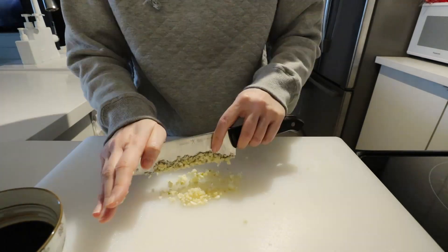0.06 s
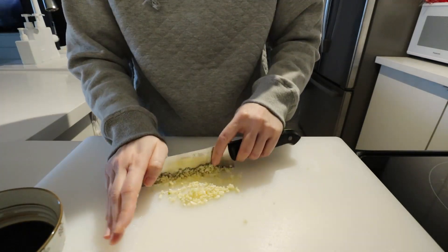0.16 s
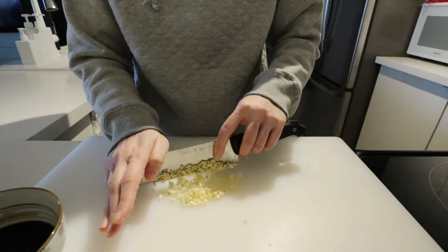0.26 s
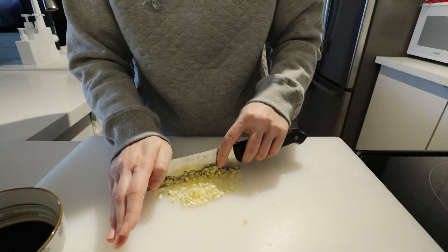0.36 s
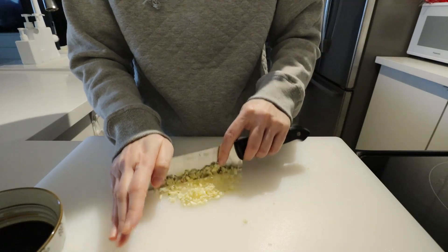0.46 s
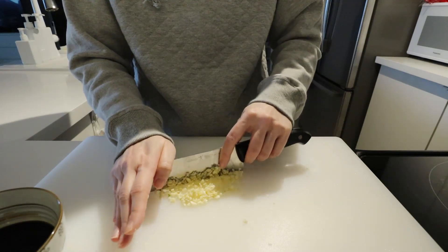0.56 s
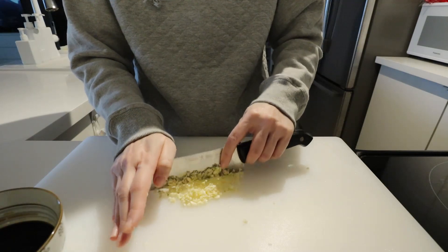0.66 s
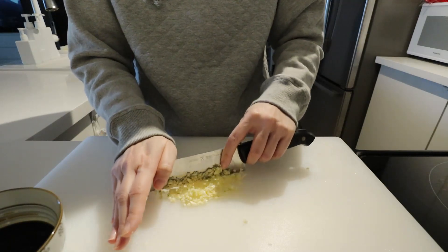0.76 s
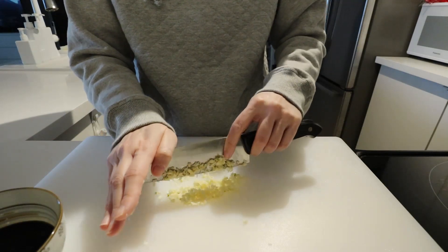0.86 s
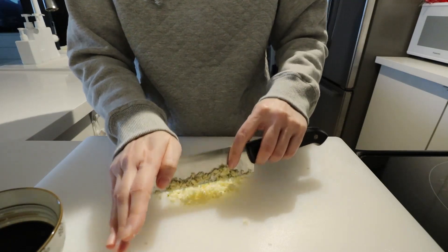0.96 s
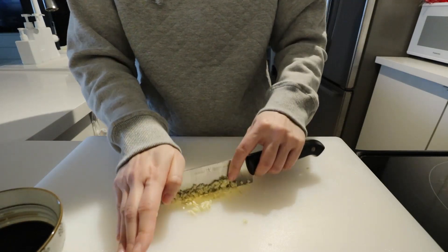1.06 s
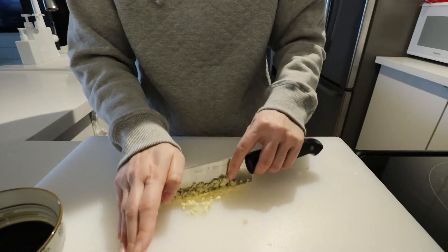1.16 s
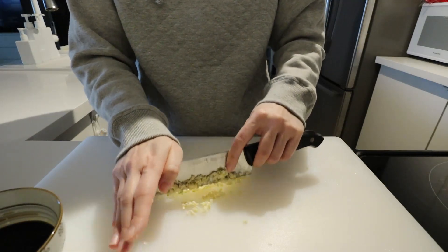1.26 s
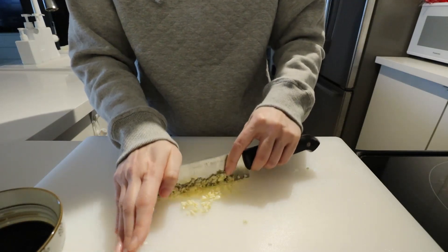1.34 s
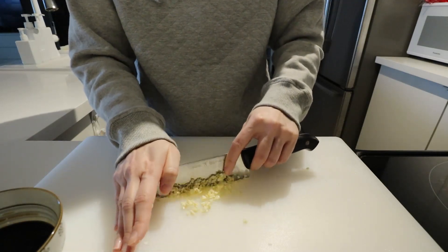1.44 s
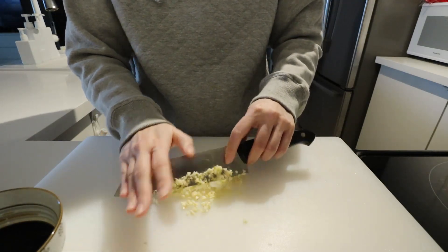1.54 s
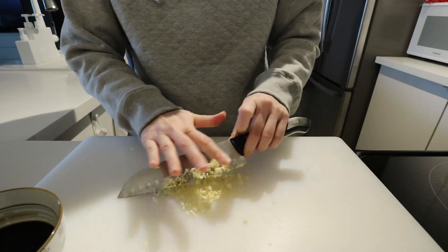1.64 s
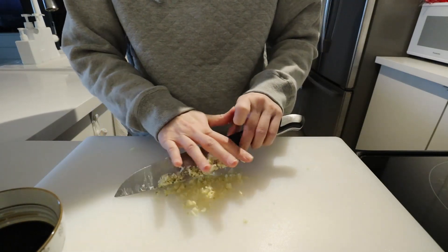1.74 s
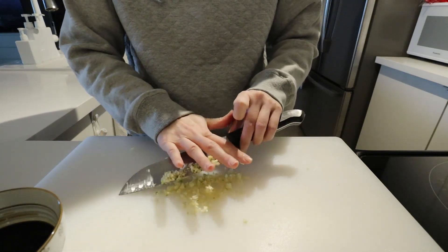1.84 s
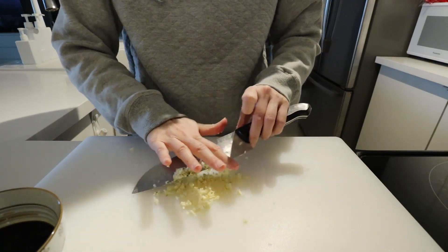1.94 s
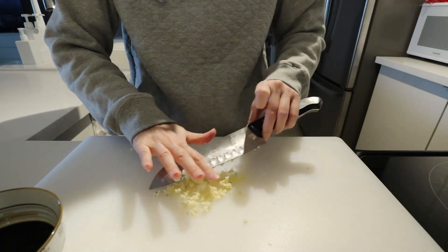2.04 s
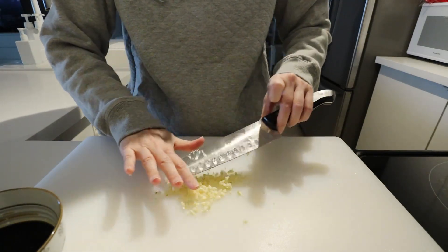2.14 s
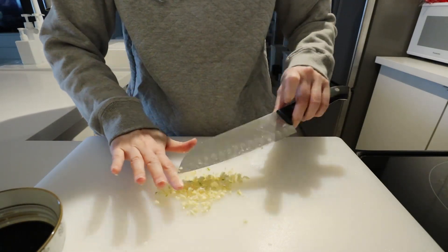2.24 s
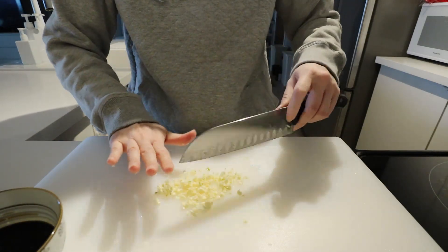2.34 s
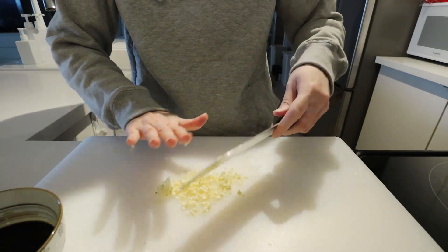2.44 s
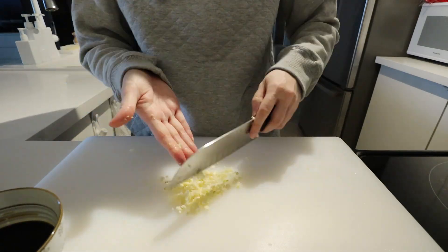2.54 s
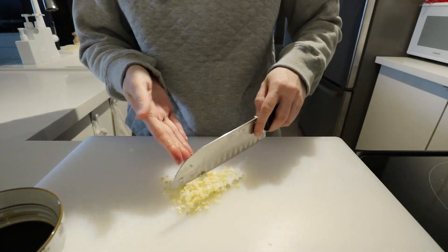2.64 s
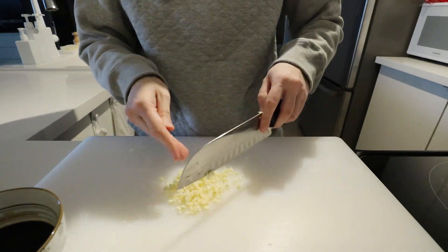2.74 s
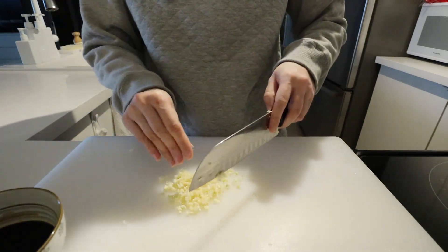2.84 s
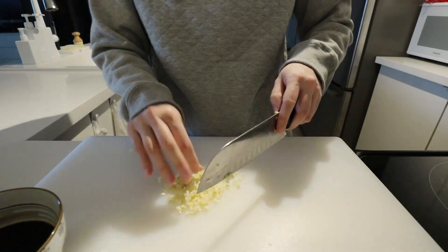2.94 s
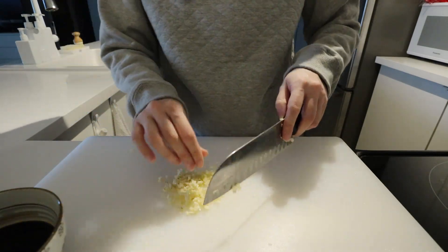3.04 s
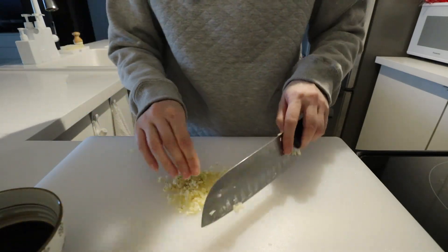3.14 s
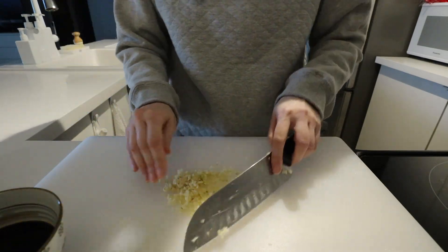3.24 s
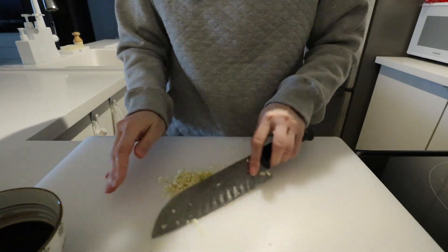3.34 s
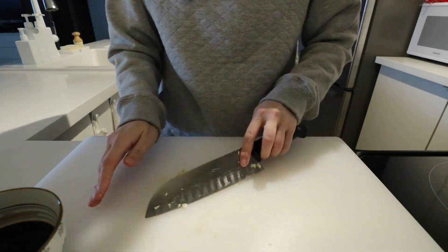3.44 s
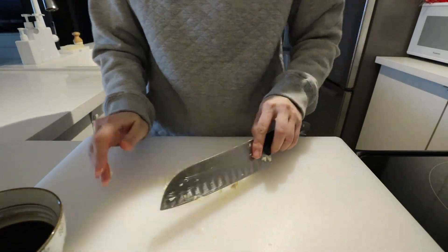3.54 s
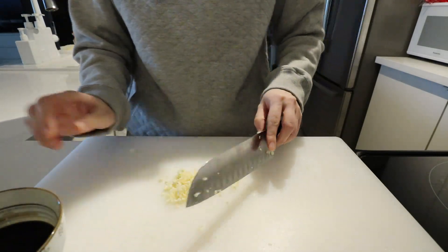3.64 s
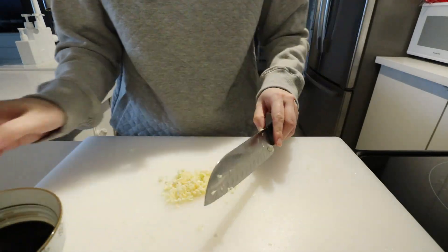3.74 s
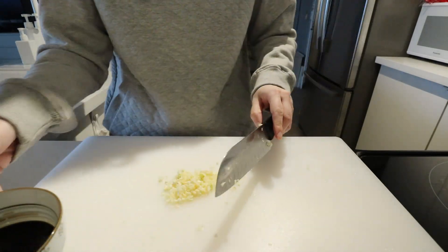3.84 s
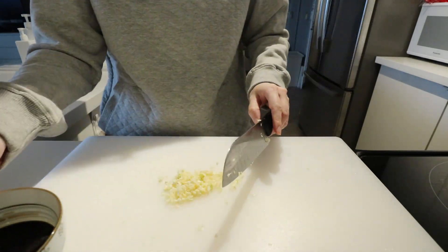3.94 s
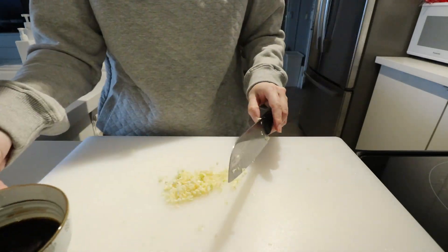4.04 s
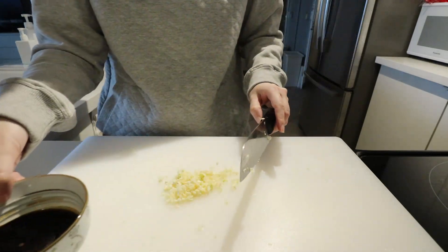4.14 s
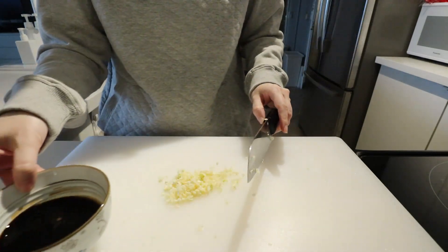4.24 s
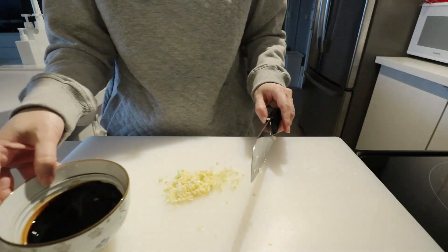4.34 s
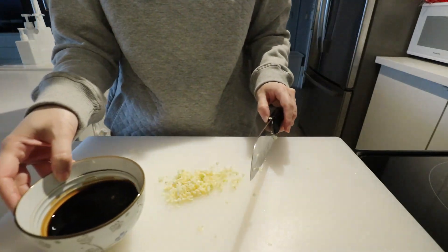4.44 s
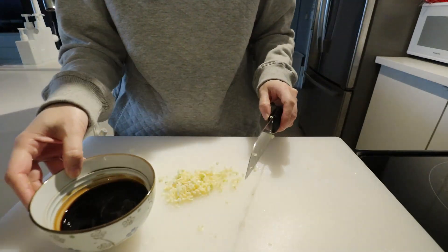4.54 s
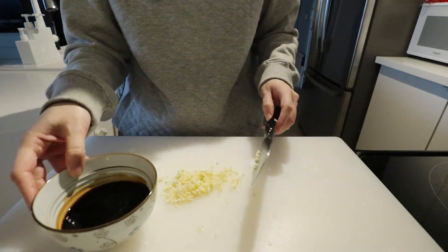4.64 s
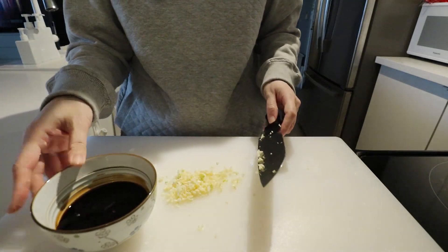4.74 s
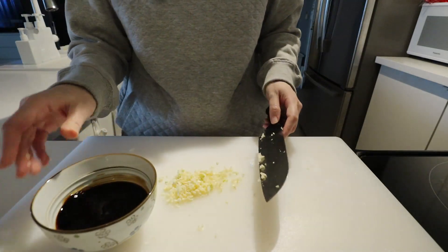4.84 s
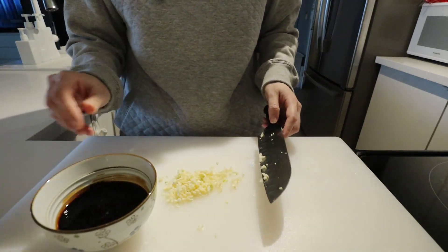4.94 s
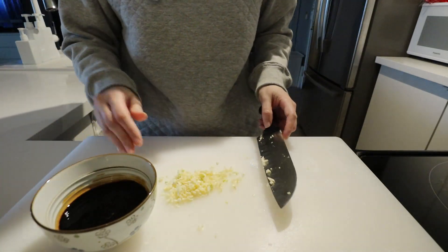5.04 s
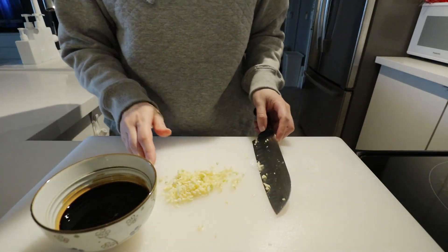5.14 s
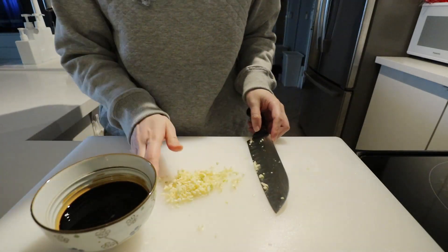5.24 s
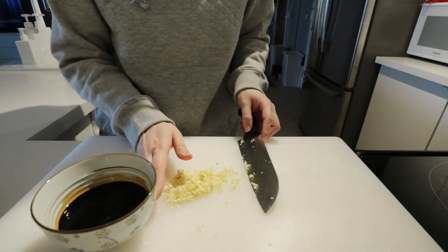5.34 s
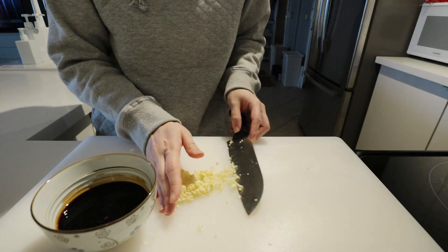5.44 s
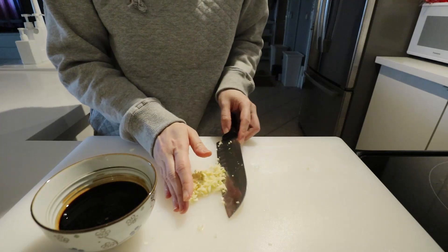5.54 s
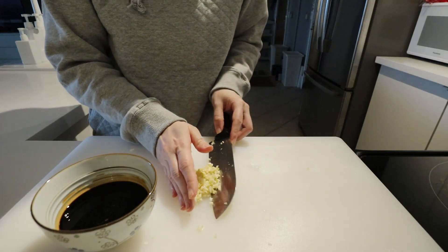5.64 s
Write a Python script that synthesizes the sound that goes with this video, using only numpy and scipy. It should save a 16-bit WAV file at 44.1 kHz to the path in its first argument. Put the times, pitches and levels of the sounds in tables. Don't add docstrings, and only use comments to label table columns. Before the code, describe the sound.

A close stereo microphone in a small, slightly reverberant kitchen hears low fridge hum and quiet room tone. Seven hard knife chops strike a plastic board at about 0.24, 0.41, 0.56, 0.77, 1.11, 1.26 and 1.45 s: dry, hollow knocks with counter thud and brief wet garlic crunches, the third and fourth sharpest, peaks flattened. The background dips, then recovers by 2.5 s. From 1.9 to 2.5 s come faint ticks, dull rubs, light sleeve rustle and a tiny squeak at 2.2 s. A short wipe of the blade sounds at 2.52 s, then a very soft stroke near 2.8 s. At 3.38 s a double knock leads into a bright scrape slowing until 3.6 s. From 4.07 to 4.7 s a bowl drags with low judder and rasp; its china rings faintly at 4.77 s. A clack at 5.22 s precedes gritty, humming shoves of the blade to the end.

```python
import sys
import numpy as np
from scipy import signal
from scipy.fft import rfft, irfft, next_fast_len
from scipy.io import wavfile
from scipy.ndimage import uniform_filter1d

SR = 44100
rng = np.random.default_rng(int(sys.argv[2]) if len(sys.argv) > 2 else 0)


def output_pcm(signal):
    pcm = np.clip(np.atleast_2d(signal).T, -1, 1) * 32767
    wavfile.write(sys.argv[1], SR, np.round(pcm).astype(np.int16))


def rack_gain(trim_db):
    fader = np.asarray(trim_db, float)
    return 10 ** (fader / 20)


N = 250929
TIME = np.arange(N) / SR
SIZE = next_fast_len(N + SR)
HZ = np.arange(SIZE // 2 + 1) * SR / SIZE + 1e-6

# (frequency [Hz], density [dB per Hz])
SCRAPE_TONE = [(240, -64.5), (400, -8), (595, 7.5), (1100, 10), (1910, -1), (2880, -7), (3620, 2),
               (10300, -18.5), (15500, -49)]
# (frequency [Hz], width [Hz], level [dB])
SCRAPE_RING = [(610.72, 90, 1.5), (1444.1, 103, 6), (3732.8, 44, -1.689), (4314.9, 40, 0.5),
               (5136.8, 180, -12.5), (6262, 440, -19), (7670, 41, -73), (9138, 61, -19.5), (10132, 32, -14)]


def level(x, db):
    return x * rack_gain(db) / np.sqrt(np.mean(x ** 2))


def steady(x, size=2600):
    return x / np.sqrt(uniform_filter1d(x ** 2, size=size))


def through(x, response):
    return irfft(rfft(x, SIZE) * response, SIZE)[..., :N]


def tone(points):
    hz, db = np.transpose(points)
    return rack_gain(np.interp(np.log(HZ), np.log(hz), db))


def peak(hz, width):
    return 1j * HZ * width / (hz ** 2 - HZ ** 2 + 1j * HZ * width)


def ring(hz, t60, seconds):
    t = np.arange(int(seconds * SR)) / SR
    return np.sin(2 * np.pi * hz * t) * rack_gain(-60 * t / t60)


def add(out, x, s):
    i = int(s * SR)
    out[i:i + len(x)] += x[:N - i]


def curve(rows, column=1):
    rows = np.array(rows)
    return np.interp(TIME, rows[:, 0], rows[:, column])


def gate(rows):
    is_open = (TIME > rows[0][0]) & (TIME < rows[-1][0])
    return uniform_filter1d(1. * is_open, size=176)


def walk(rate):
    k = int(SR / rate)
    held = np.repeat(rng.standard_normal(N // k + 1), k)
    return 0.71 * uniform_filter1d(held, k)[:N]


def grit(spread_db, flutter_db, rate):
    catches = np.minimum(rng.exponential(size=N), 4)
    return rng.standard_normal(N) * rack_gain(spread_db * catches + flutter_db * walk(rate))


def strokes(rows, attack_s, release_s, extra_db_s=0):
    first_s, last_s = rows[0][0], rows[-1][0] + rows[-1][1]
    gain = 0
    for s, length_s, db, drift_db_s in rows:
        edges = np.maximum(s - TIME, 0) / attack_s + np.maximum(TIME - s - length_s, 0) / release_s
        drift_db = drift_db_s * np.clip(TIME - s, 0, length_s)
        gain = gain + rack_gain(db + drift_db - 30 * np.minimum(edges, 5))
    return gain * rack_gain(extra_db_s * np.clip(TIME - first_s, 0, last_s - first_s))


def chops():
    # (time [s], peak level [dB], crush length [ms], crunch level [dB], contact [ms])
    blows = [
        (0.238, -11, 16.23, -41, 0.51375),
        (0.413, -16.5, 20.985, -35, 0.80405),
        (0.563, -7.5, 9.145, -47, 0.08826),
        (0.768, -10, 7.7, -49, 0.09285),
        (1.109, -12.5, 19, -44, 0.32),
        (1.257, -14, 9.2, -50.5, 0.26),
        (1.445, -13.5, 11.886, -40.5, 0.3656),
    ]
    # (frequency [Hz], level [dB], t60 [s])
    board_modes = [(85.72, 3.5, 0.12), (194.46, -1.5, 0.03), (541.66, 2.5, .04), (728.12, 5.5, 0.041),
                   (793.65, 3.5, 0.048), (882.54, 7, 0.054), (1128.8, 3.5, .04), (1380, 9.5, 0.02284),
                   (1775, -5, 0.065), (2050, -8, .02), (1104, -7.5, 0.0062), (2573.9, -30, 0.016)]
    ping_db = -43
    thud_at_1ms_db, thud_db_per_doubling = -3.5, 5.5
    snap_db, snap_db_per_db, snap_t60_s = -37, 3, 0.029
    clamp_ms, clamp_db = 5.6, -7

    board, edge, snap = np.zeros((3, N))
    t = np.arange(int(.25 * SR)) / SR
    push_ms = 1000 * t[:220] - 1
    clamp = rack_gain(clamp_db / (1 + np.exp(np.clip((clamp_ms - 1000 * t) / 0.29, -50, 50))))
    lead_s = np.arange(-.04, .03, 1 / SR)
    chance = rng.standard_normal((len(blows), 2, len(board_modes)))
    sign = -(-1.) ** (np.arange(len(board_modes)) // 2)
    for (s, db, crush_ms, crunch_db, contact_ms), (spot, detune) in zip(blows, chance):
        thud_db = thud_at_1ms_db + thud_db_per_doubling * np.log2(contact_ms)
        modes = 0
        for (hz, mode_db, t60), k, a, b in zip(board_modes, sign, spot, detune):
            gain = k * rack_gain(mode_db + 0.41 * a + thud_db * (hz < 300))
            modes = modes + gain * ring(hz * (1 + 0.02 * b), t60, .25)
        push = .12 * contact_ms ** 3 * np.exp(-.5 * (push_ms / .06) ** 2)
        for late_ms, size in ((0, 0.87), (2.2, 0.1)):
            push = push + size * np.exp(-.5 * ((push_ms - late_ms) / (0.26534 * contact_ms)) ** 2)
        blow = np.convolve(modes, push)[:len(t)] * clamp
        add(board, rack_gain(db) * blow / np.abs(blow).max(), s)
        ping = np.convolve(ring(3480, 0.0062, .01), np.hanning(8))
        add(board, rack_gain(ping_db + 5.1 * (db + 8.5)) * ping, s + .0009)
        away_s = np.where(lead_s < 0, -lead_s, 1.1 * lead_s)
        crush = rack_gain(crunch_db - 20 * away_s / (crush_ms / 1000))
        add(edge, rack_gain(db) * crush, s + lead_s[0])
        add(snap, rack_gain(snap_db + snap_db_per_db * (db + 10) - 60 * t / snap_t60_s), s + 0.00049)
    crack = through(snap * rng.standard_normal(N), peak(3100, 2000) ** 3)
    garlic = (peak(4900, 3400) ** 2 + 0.36 * peak(6200, 7000) ** 2
              + .4 * peak(3500, 1500) ** 2 + 0.66 * peak(1800, 1000) ** 2)
    return board + crack + through(edge * level(grit(1.4, 1.5, 400), 0), garlic)


def ticks():
    # (time [s], peak level [dB], centre [Hz], fizz level [dB])
    knocks = [(1.889, -58.5, 762.3, -13), (1.912, -56.5, 776, -16.5), (1.939, -54.5, 764.4, -11.5),
              (1.962, -58, 760, -5.5), (1.995, -58, 1308, 0.5), (2.037, -61, 951.2, -2),
              (2.057, -59, 950, 4.5), (2.342, -66, 778.4, 6), (2.419, -62.5, 677.6, 6.5),
              (2.436, -65.5, 868.8, 6), (2.464, -60.5, 849.6, 7.5), (3.38, -31.5, 1919, -9.5),
              (3.403, -34, 2012, 4.5), (3.801, -52.5, 1583, -9), (4.085, -58, 558.9, -24.5),
              (4.129, -51, 1319, -16), (4.475, -54.5, 2432, 7.5), (4.512, -43.5, 722, -19),
              (4.575, -46.5, 1621, -6), (4.828, -59.5, 3792, -5.5), (5.219, -35, 1380, -10.5),
              (5.222, -41.5, 2672, -6.5), (5.225, -38.5, 779.1, -23)]
    tick_t60_s, tick_thud_db = 0.018296, -13
    dull_stretch, loud_stretch = .35, 0.13
    dull_thud = 0.4561

    note, fizz, thud = np.zeros((3, N))
    chance = rng.standard_normal((len(knocks), 1500))
    for (s, db, hz, fizz_db), puff in zip(knocks, chance):
        t60 = tick_t60_s * rack_gain(-dull_stretch * fizz_db + loud_stretch * (db + 59))
        puff = puff * rack_gain(-60 * np.arange(1500) / SR / t60)
        knock = np.convolve(puff, ring(hz, 0.013, 0.01))[:1500]
        add(note, rack_gain(db) * knock / np.abs(knock).max(), s)
        add(fizz, rack_gain(db + fizz_db) * puff, s)
        add(thud, rack_gain(db + tick_thud_db - dull_thud * fizz_db + 21) * puff, s)
    return (through(note, peak(1500, 2800)) + through(fizz, peak(3800, 3900) ** 3 * peak(3000, 9000))
            + through(thud, peak(170, 340) * peak(240, 800)))


def rub(rows, feel, colour, rings, ring_db, spread_db, flutter_db, steel_db):
    attack_s, release_s, body_db, hiss_db, hiss_db_s = feel
    low, high = 1 / (1 + (HZ / 950) ** 6), 1 / (1 + (3250 / HZ) ** 6)
    contact = tone(colour) + sum(rack_gain(ring_db + db) * peak(hz, width) for hz, width, db in rings)
    steel = sum(peak(hz, 45) for hz in 1800 * 7 ** rng.random(size=36))
    contact = contact * (1 + rack_gain(steel_db) * steel)
    pressure = rack_gain(flutter_db * walk(60))
    out = 0
    for db, db_s, band in ((0, 0, 1 - low - high), (body_db, 0, low), (hiss_db, hiss_db_s, high)):
        push = pressure * grit(spread_db, 1.0, 110)
        force = rack_gain(db) * strokes(rows, attack_s, release_s, db_s)
        out = out + through(push * force, contact * band) / np.std(through(push, contact * band))
    return out


def gather():
    # (start [s], length [s], level [dB], drift [dB/s])
    rows = [
        (1.888, 0.0071, -71.5, -5.5),
        (1.95, 0.05476, -70, 30),
        (2.03, .035, -71.5, 8.5),
        (2.21, .03, -83, 5.5),
        (2.3, 0.15, -92.5, 9),
    ]
    feel = (0.0147, 0.0005, 4.5, -12, 4.5)
    # (frequency [Hz], density [dB per Hz])
    colour = [(350, -6.5), (600, -11), (1070, -9), (1350, 7), (1990, -10.5), (5040, -22), (15000, -38.5)]
    return rub(rows, feel, colour, [], -20, 2.867, 3.65, 2.4)


def wipe():
    # (start [s], length [s], level [dB], drift [dB/s])
    rows = [
        (2.522, 0.07561, -49.5, -20),
        (2.62, .06, -68.5, -220),
    ]
    feel = (0.0067, 0.0349, 0.5, -4, 51)
    # (frequency [Hz], density [dB per Hz])
    colour = [(240, -77.5), (400, -55), (511, -3), (653, 1), (2250, -11), (2430, -9), (3300, -12.5),
              (7440, -22.5), (15500, -32)]
    # (frequency [Hz], width [Hz], level [dB])
    rings = [(511.96, 17, 6), (1966.5, 200, -15), (2450.8, 45, -8), (5235, 16, -13.5), (6400, 48, -35),
             (7186.7, 64, -21), (7850, 23, -36.5)]
    return rub(rows, feel, colour, rings, 8.2, 1.3, 1.3, 6.1)


def sweep():
    # (start [s], length [s], level [dB], drift [dB/s])
    rows = [
        (2.8, 0.18, -72, -9),
    ]
    feel = (0.4, 1.3231, -7.5, -13, -2)
    # (frequency [Hz], density [dB per Hz])
    colour = [(500, -31), (1500, -4.5), (2800, -8.5), (6000, -24), (15000, -44.5)]
    # (frequency [Hz], width [Hz], level [dB])
    rings = [(1591.8, 170, 5), (2789.5, 180, -0.5)]
    return rub(rows, feel, colour, rings, 3, 1.3, 3.4, -25)


def touch():
    # (start [s], length [s], level [dB], drift [dB/s])
    rows = [
        (3.3805, .01, -46.5, 5),
        (3.4035, 0.0068, -50, -5),
    ]
    feel = (0.0054, 0.0171, 2, -6.5, 101)
    return rub(rows, feel, SCRAPE_TONE, SCRAPE_RING, 12.186, 1.8, 2.2, 18)


def scrape():
    # (start [s], length [s], level [dB], drift [dB/s])
    rows = [
        (3.424, 0.064, -39, -110),
        (3.5, 0.1195, -52.5, -170),
    ]
    feel = (0.0091, 0.0332, -6.5, 0.032, -115)
    return rub(rows, feel, SCRAPE_TONE, SCRAPE_RING, 8, 3.8, 2.9, 4.5)


def scoop():
    # (start [s], length [s], level [dB], drift [dB/s])
    rows = [
        (5.24, 0.03698, -63, -150),
        (5.33, 0.09607, -51, -75),
        (5.44, 0.065856, -48, 5.5),
        (5.542, 0.065085, -49, 57),
        (5.63, .06, -51, -17.5),
    ]
    feel = (0.0397, 0.0518, -1, -9.5, -3)
    # (frequency [Hz], density [dB per Hz])
    colour = [(150, -28), (250, -3), (371, -7.5), (844, 2), (1590, -5.5), (1790, -7.5), (2950, -14),
              (5370, -17), (10500, -37.5), (13000, -60)]
    # (frequency [Hz], width [Hz], level [dB])
    rings = [(232.1, 54, 0), (497.5, 31, -1.5), (796, 32.43, 20.5), (1336.8, 37, 28.5), (1726, 65, 5.5),
             (3030, 93, -18.5), (4562.5, 150, 12), (5230, 61, -24.5)]
    return rub(rows, feel, colour, rings, -24.5, 2.0, 2.2, 3.5)


def judder():
    # (start [s], length [s], level [dB], drift [dB/s])
    rows = [
        (5.38, 0.04229, -46, -10),
        (5.535, 0.02085, -46.5, -51),
        (5.665, 0.01934, -55, -3.5),
    ]
    hum = through(grit(1.396, 2.964, 40), peak(218.58, 46.54) * peak(166, 136.05))
    return strokes(rows, 0.103, 0.06065) * steady(hum)


def drag():
    # (time [s], level [dB])
    foot = [(4.06, -76), (4.082, -42), (4.2, -35.5), (4.32, -40), (4.42, -41), (4.51, -43), (4.6, -51),
            (4.67, -55), (4.74, -89.5)]
    # (frequency [Hz], density [dB per Hz])
    body_tone = [(150, -41.5), (260, 3.5), (370, -6), (456, -2), (498, -9.5), (549, -1), (900, -40.5),
                 (1170, -52.5), (1980, -120)]
    # (frequency [Hz], density [dB per Hz])
    rasp_tone = [(470, -25), (800, 2.5), (1110, -8), (1200, -8.5), (1740, -4.5), (3270, -23.5), (9000, -54),
                 (11700, -76.5), (19800, -120)]
    # (time [s], level [dB])
    rocks = [(4.11, -47), (4.2, -41.5), (4.335, -48), (4.42, -37.5), (4.47, -44.5), (4.511, -39),
             (4.57, -45), (4.62, -45)]
    # (start [s], length [s], level [dB], drift [dB/s])
    slide = [
        (4.16, 0.46845, -52.5, -19),
    ]
    rattle_db, rock_s = -6.5, 0.018

    hum = through(grit(4.78, 4.3, 45), peak(183.65, 50) * peak(160, 150))
    wobble = through(grit(3.1, 2.0, 30), peak(101, 32) * peak(95, 90))
    body = through(grit(2.885, 3.8, 60), tone(body_tone))
    rasp_modes = peak(1270, 43) + peak(1417, 49) + peak(1688, 29)
    rasp = through(grit(1.7, 2.2, 30), tone(rasp_tone) * (1 + 2.506 * rasp_modes))
    pressed = rack_gain(curve(foot)) * gate(foot) * (steady(hum) + rack_gain(rattle_db) * steady(body))
    rocking = strokes([(s, rock_s, db, 0) for s, db in rocks], attack_s=0.036, release_s=.07)
    sliding = strokes(slide, attack_s=0.08542, release_s=0.063)
    return pressed + rocking * steady(wobble) + sliding * steady(rasp)


def bowl():
    # (frequency [Hz], t60 [s])
    china_modes = [(1615, 1.4), (3978, .5), (7100, .2), (10700, .15)]
    # (time [s], level [dB], favoured mode [Hz])
    taps = [
        (4.77, -58.5, 1615),
        (4.771, -80, 10700),
        (4.796, -76, 7100),
        (4.827, -68, 3978),
        (4.854, -66.5, 1615),
    ]
    spot_db_per_octave = 20
    out = 0
    for s, db, favoured in taps:
        since = np.maximum(TIME - s, 0)
        attack = np.minimum(since / 0.00092, 1)
        for hz, t60 in china_modes:
            share_db = -spot_db_per_octave * abs(np.log2(hz / favoured))
            fade = rack_gain(db + share_db - 60 * since / t60)
            out = out + fade * attack * np.sin(2 * np.pi * hz * TIME)
    return out


def squeak():
    # (time [s], frequency [Hz], level [dB])
    chirp = [
        (2.2, 2000, -87),
        (2.215, 2197, -74),
        (2.23, 2050, -71.5),
        (2.242, 1793, -70),
    ]
    phase = 2 * np.pi * np.cumsum(curve(chirp)) / SR
    return rack_gain(curve(chirp, column=2)) * gate(chirp) * (np.sin(phase) + 0.89 * np.sin(1.45 * phase))


def rustle():
    # (start [s], length [s], level [dB], drift [dB/s])
    rows = [
        (1.98, 0.2352, -80.5, -9),
        (3.3, 0.03193, -79, -36.5),
        (3.52, .015, -76.5, -50),
        (3.64, 0.0564, -85, 59.5),
    ]
    # (frequency [Hz], density [dB per Hz])
    colour = [(1470, -40.5), (2500, 7.5), (5620, 4.5), (8110, 0), (13600, -15), (15000, -30.5)]
    cloth = level(through(grit(2.8, 4.3, 54), tone(colour)), 0)
    return cloth * strokes(rows, .1, 0.14)


def kitchen():
    # (frequency [Hz], t60 [s], level [dB])
    bands = [(159.92, 0.43, -4), (491.37, 0.19, -8.5), (974, 0.6045, -17), (2000, 0.58, -21.5),
             (4041.3, 0.44, -38), (8983.3, .25, -57.5)]
    t = np.arange(SR * 3 // 4) / SR
    gap = np.clip((t - .003) / 0.0036, 0, 1)
    near_fade = 2.1 * rack_gain(-60 * t / 0.0561)
    tail = 0
    for hz, t60, db in bands:
        decay = rng.standard_normal((2, len(t))) * (rack_gain(-60 * t / t60) + near_fade) * gap
        tail = tail + rack_gain(db) * rfft(decay, SIZE) * peak(hz, .8 * hz) / np.sqrt(SR * t60 / 13.8)
    return tail


def air():
    # (time [s], level [dB])
    duck = [(0, -4), (.065, -6.5), (.085, -0.5), (.42, 3), (.75, -8.5), (1.75, -8), (2.5, -0.5), (3.0, 0.5),
            (5.69, 0.5)]
    # (frequency [Hz], density [dB per Hz])
    mid_tone = [(12, -35.5), (20, 1.5), (59, -6), (157, -7), (180, -15.5), (213, 6), (245, -13.5),
                (382, -25.5), (478, -14), (565, -27), (631, -17.5), (1040, -29), (1580, -31), (15500, -65)]
    # (frequency [Hz], density [dB per Hz])
    side_tone = [(35, -49), (60, -21), (107, -3), (559, -4), (773, -4.5), (976, -6.5), (4220, -17),
                 (13800, -36), (15500, -15.5)]
    # (frequency [Hz], width [Hz], level [dB])
    fridge = [(57.03, 9.6, -59.5), (118.14, 27, -61.5), (211.69, 8, -63.5), (425.99, 22, -72.5)]
    mid_db, side_db = -53.5, -67
    mid = level(through(rng.standard_normal(N), tone(mid_tone)), mid_db)
    for hz, width, db in fridge:
        hum = through(rng.standard_normal(N), peak(hz, width) ** 2) + hz / 590000000.0
        mid = mid + rack_gain(db) * steady(hum, size=9000)
    side = level(through(rng.standard_normal(N), tone(side_tone)), side_db)
    return rack_gain(curve(duck)) * np.array([mid + side, mid - side])


def scene():
    # (frequency [Hz], level [dB])
    ports = [(60, -31), (125, -26), (250, -24), (500, -12), (1000, -13), (2000, -7), (4000, 0), (8000, 5),
             (14000, 4)]
    rubs = gather() + wipe() + touch() + scrape() + scoop() + sweep()
    near = chops() + ticks() + rubs + judder() + drag() + bowl() + squeak() + rustle()
    wet_mid, wet_side = kitchen()
    turn = .5 + 1.1 * np.tanh((HZ / 1500) ** 2) + .9 * np.sin(HZ / 500) * np.tanh((HZ / 3000) ** 2)
    mid = through(near, 1 + wet_mid)
    side = through(near, tone(ports) * (rack_gain(-1.5) * np.exp(1j * turn) + wet_side))
    return np.array([mid + side, mid - side]) + air()


def band_limit(x):
    return signal.sosfilt(signal.butter(12, 15860, fs=SR, output="sos"), x)


def record(dry):
    clip_db = -10.6
    flat = dry / (1 + np.abs(dry / rack_gain(clip_db)) ** 4) ** (1 / 4)
    return band_limit(flat)


dry = scene()
out = record(dry)
output_pcm(out)
```